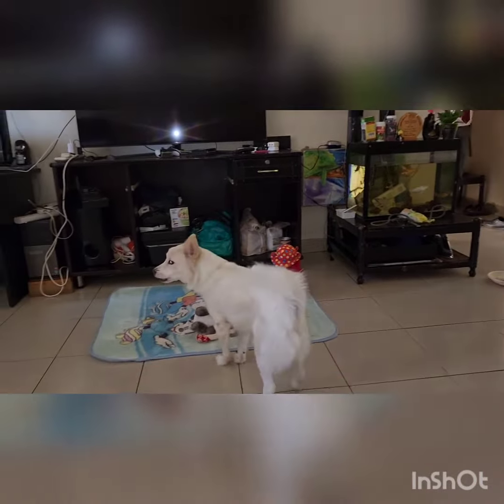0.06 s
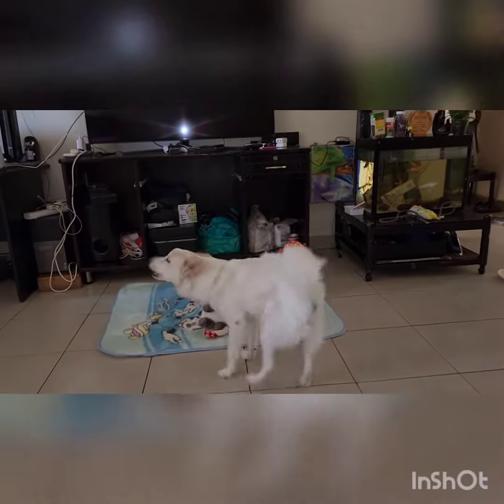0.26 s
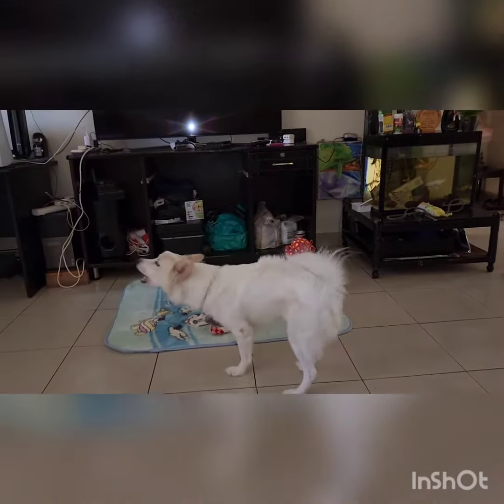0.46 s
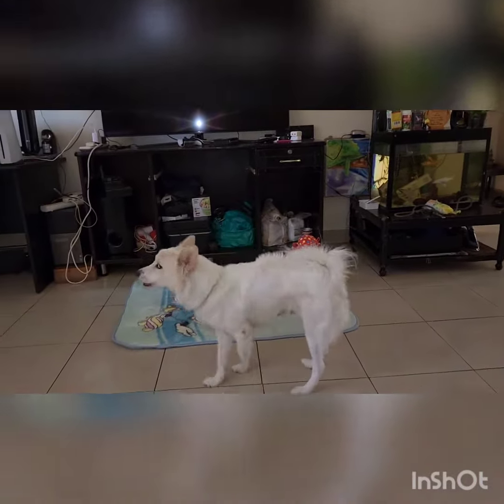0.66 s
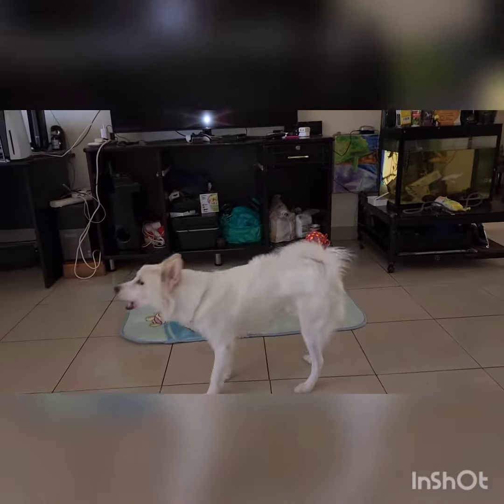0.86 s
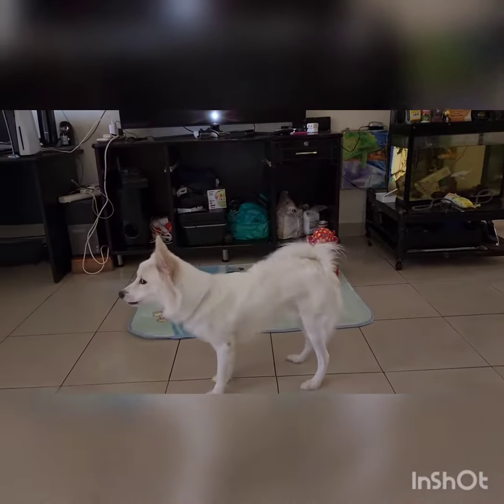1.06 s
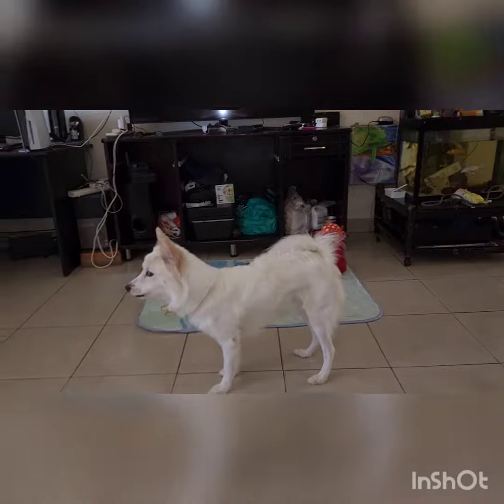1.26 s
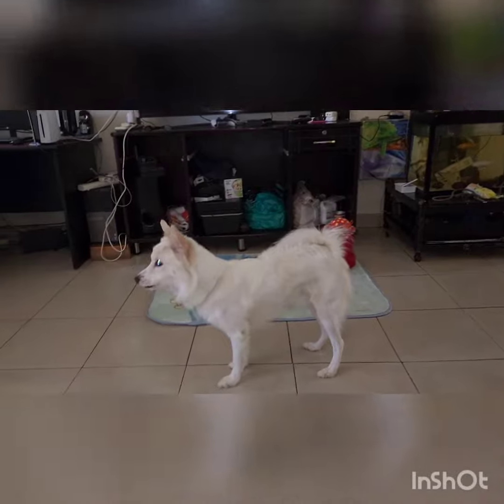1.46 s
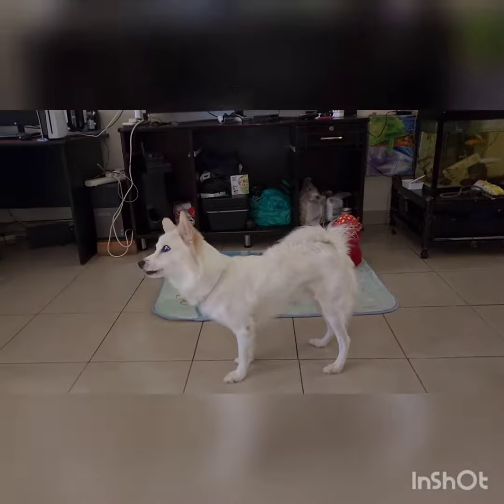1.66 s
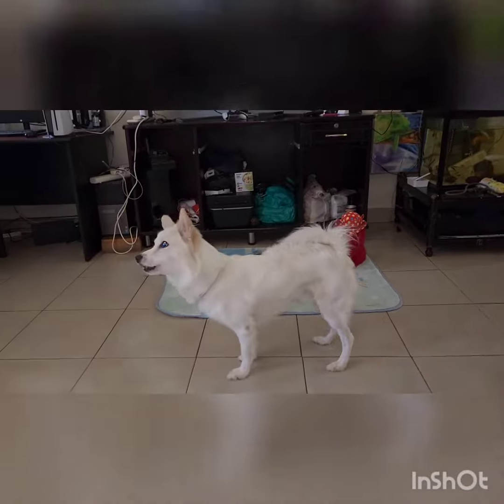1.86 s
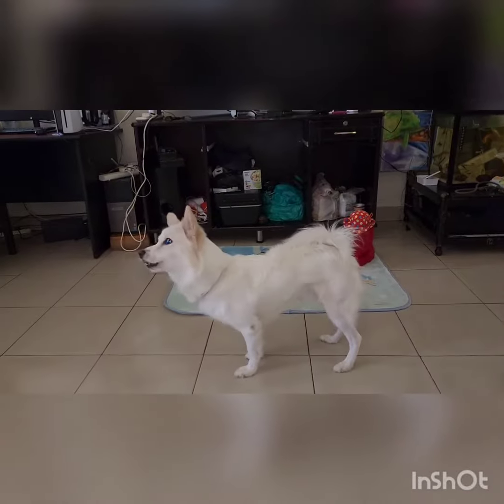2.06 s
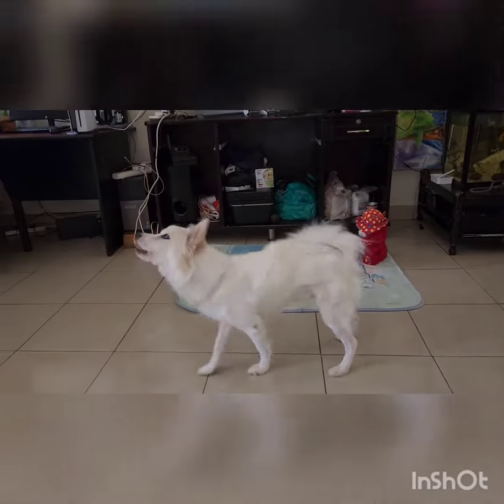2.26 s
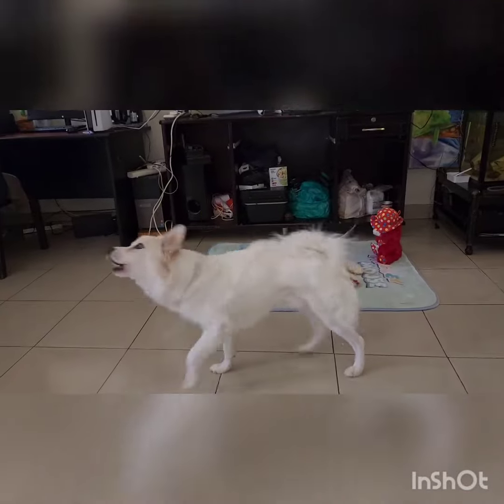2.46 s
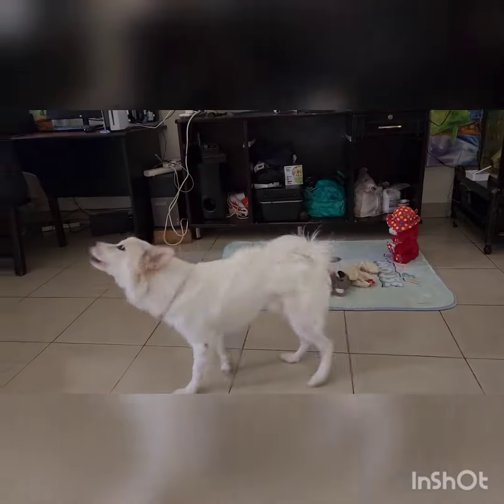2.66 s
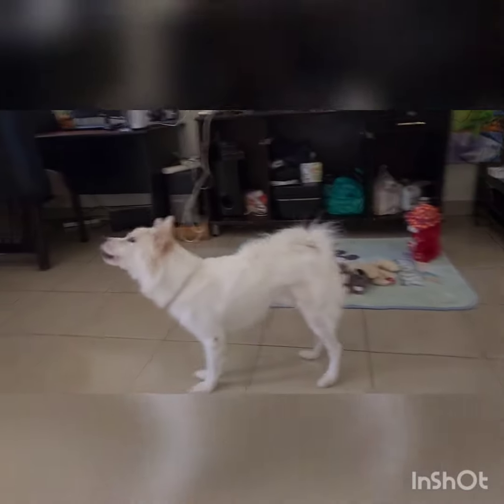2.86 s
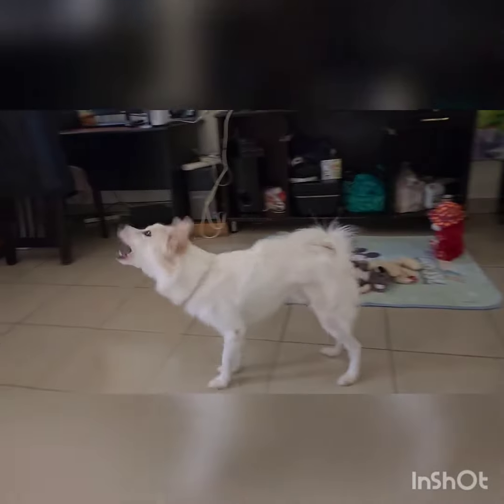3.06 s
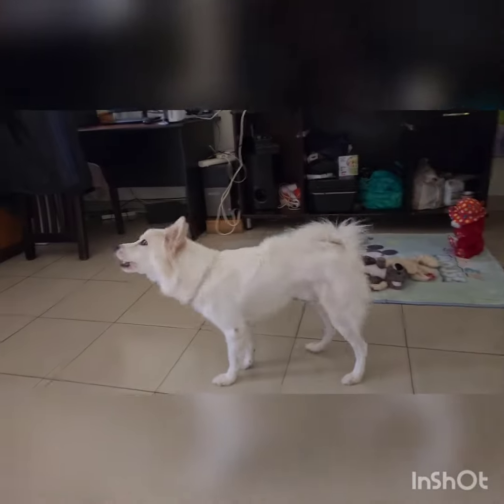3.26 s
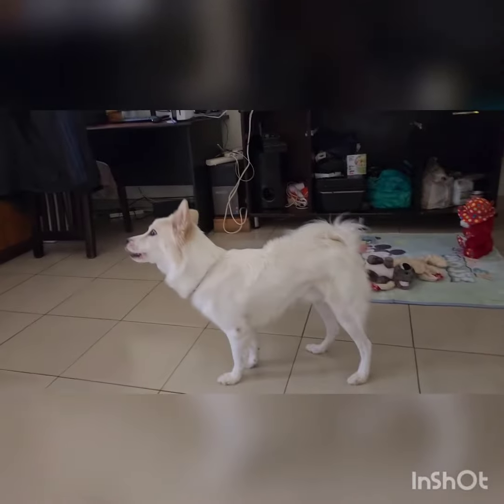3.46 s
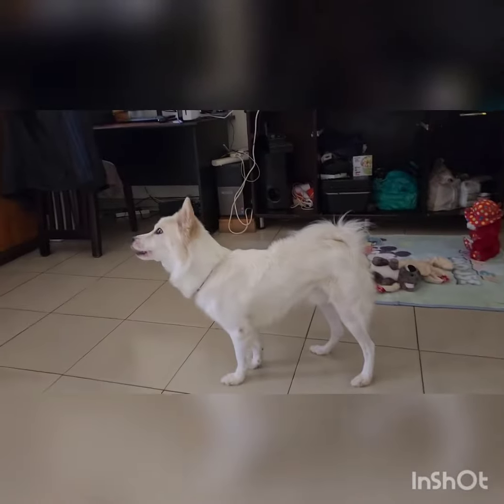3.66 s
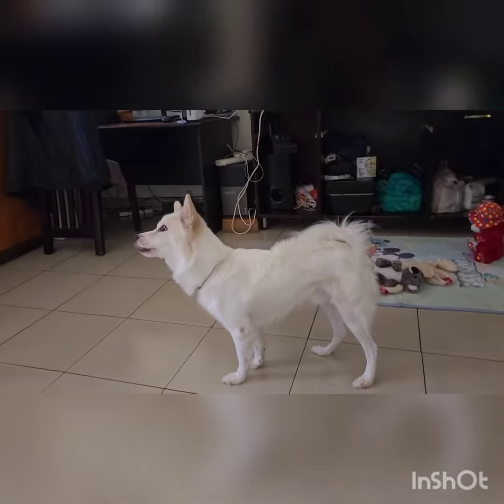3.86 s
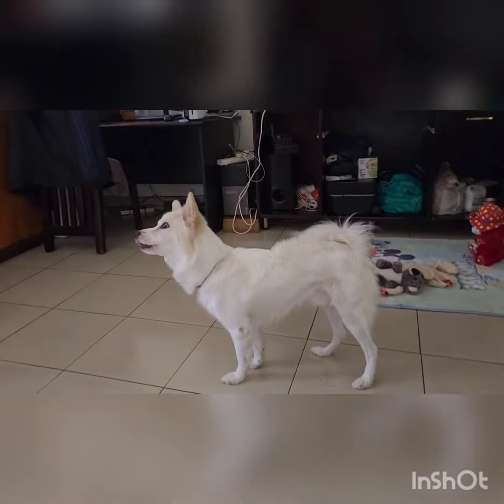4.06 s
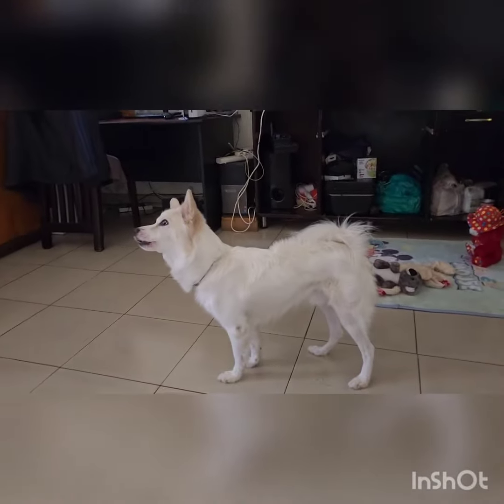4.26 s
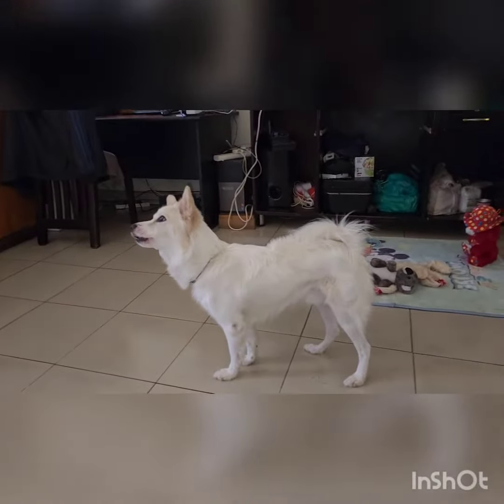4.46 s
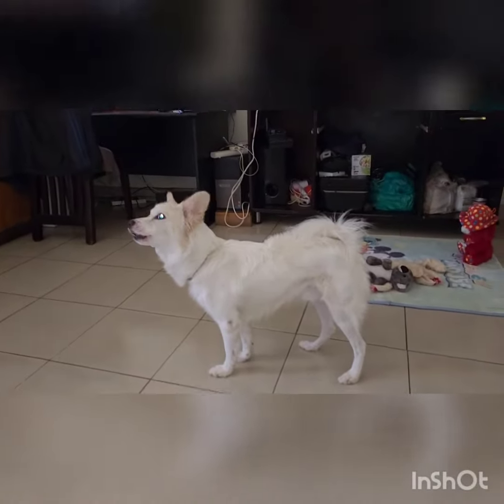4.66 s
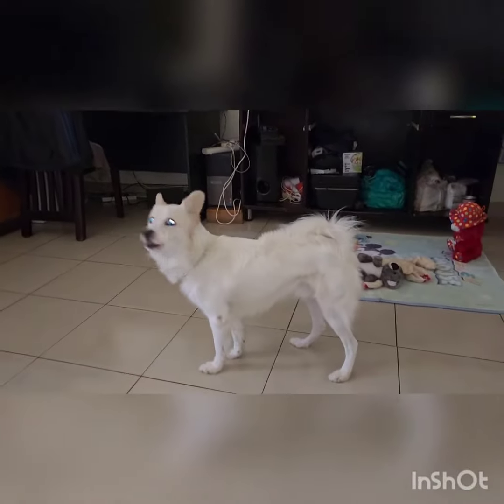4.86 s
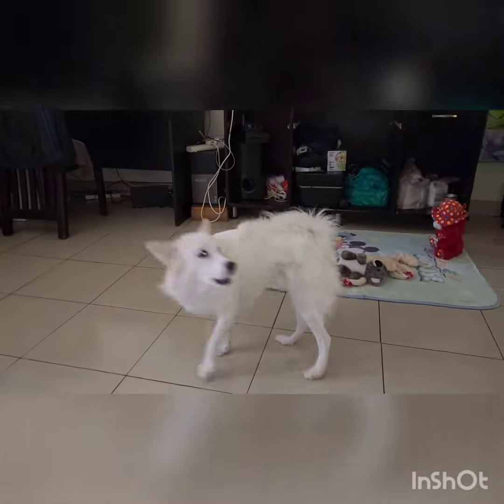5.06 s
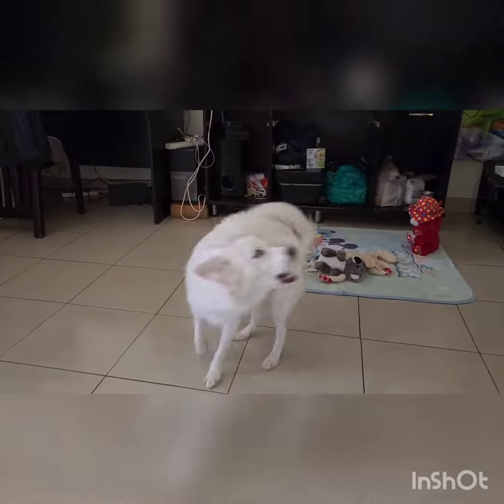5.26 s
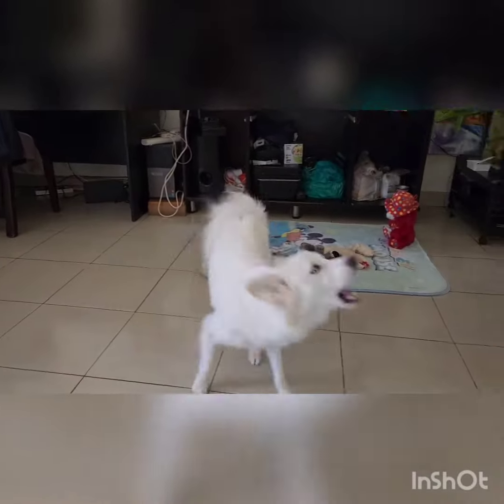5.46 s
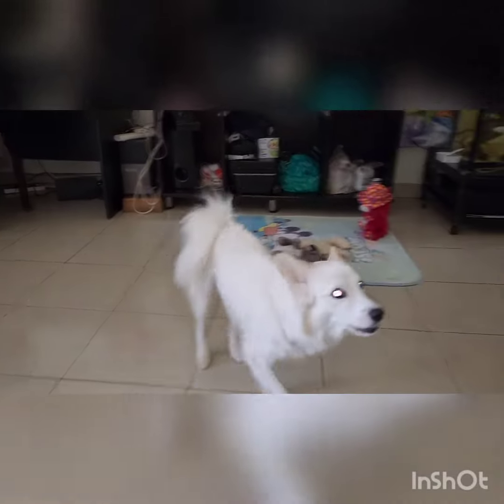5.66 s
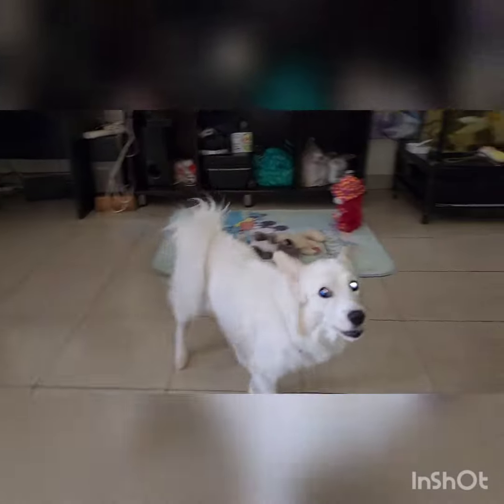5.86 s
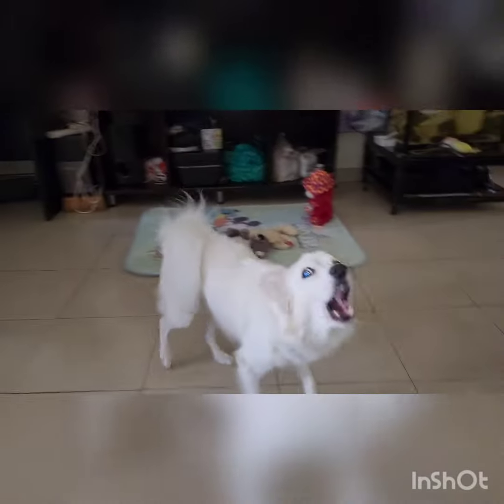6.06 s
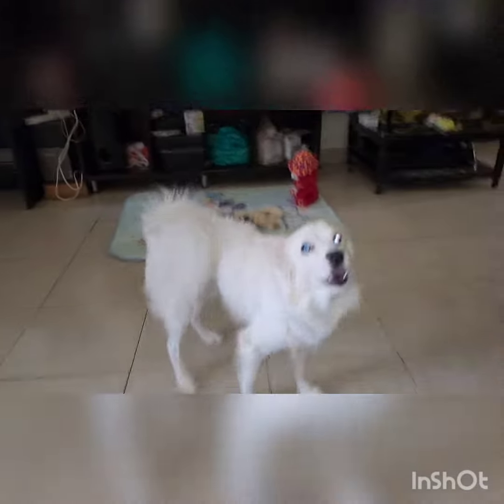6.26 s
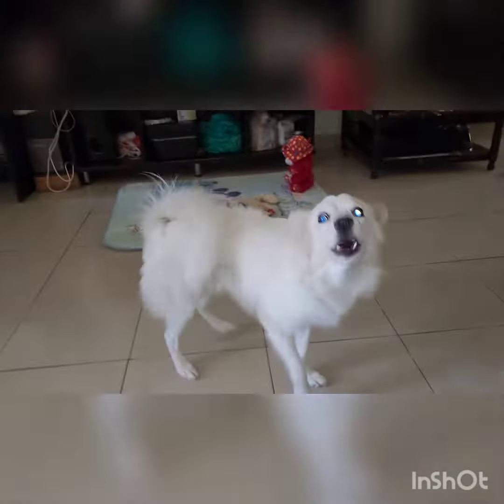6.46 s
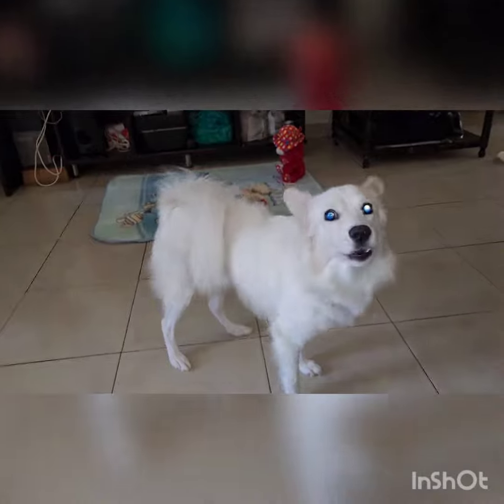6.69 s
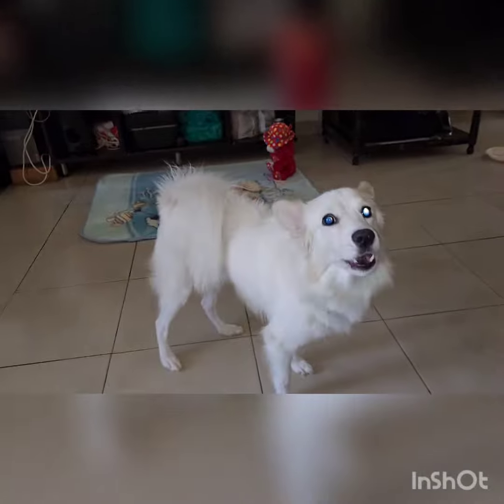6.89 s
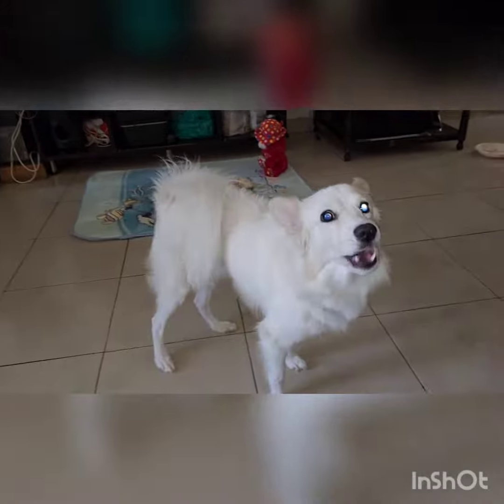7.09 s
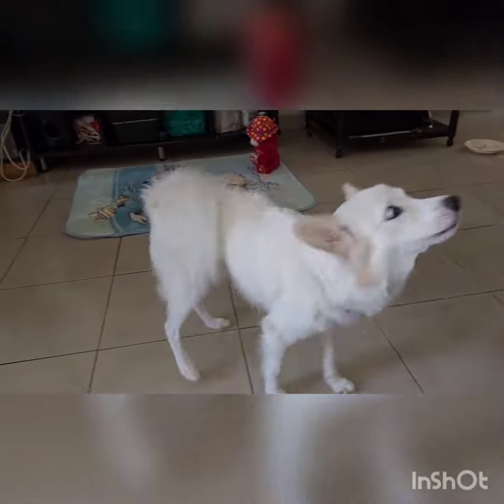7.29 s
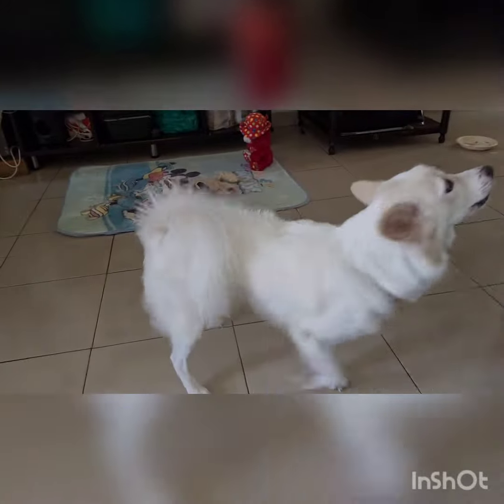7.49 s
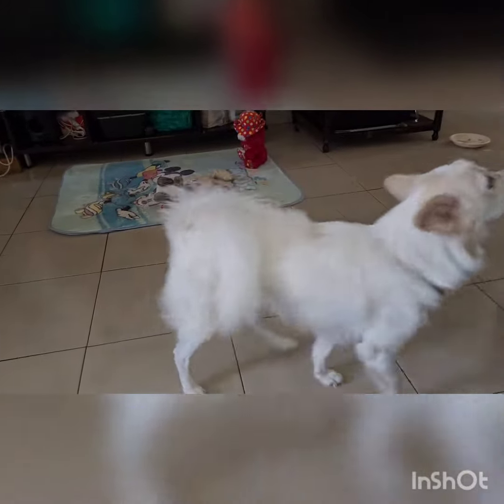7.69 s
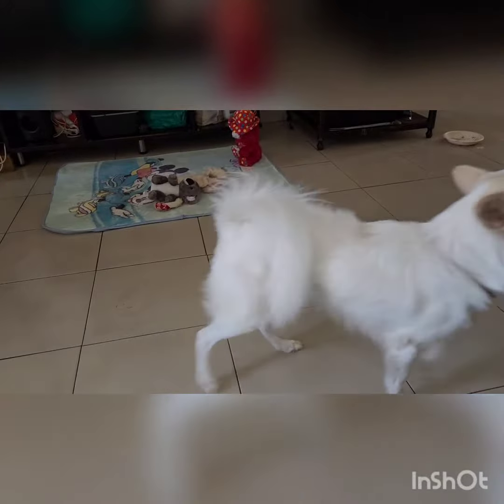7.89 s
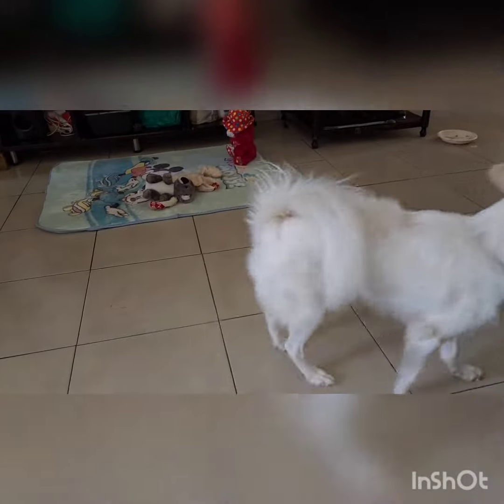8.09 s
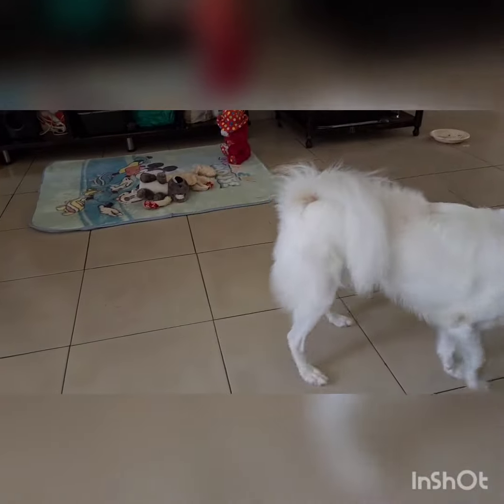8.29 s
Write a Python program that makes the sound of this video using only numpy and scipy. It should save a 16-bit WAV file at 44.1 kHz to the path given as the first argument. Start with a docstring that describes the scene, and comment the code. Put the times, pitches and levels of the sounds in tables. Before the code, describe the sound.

A small dog growls briefly and gives three quick, hoarse barks in the first second, echoing in a hard tiled room over a faint low hum. At about 1.9 seconds there is a bump with a short, deep boom. Four more barks follow between 2.2 and 3.3 seconds. Faint rustling fills the pause around 4 to 4.7 seconds, then come two dull, woody knocks just before 5 seconds and a light patter of claws on the tiles. A short growl rises into a sharp bark at 5.2 seconds, with three more by 6.5 seconds, now more direct and slightly to the right as the dog faces the microphone. Another growl at 6.9 seconds leads to a last bark at 7.2. A weaker growl comes at 7.7 seconds, and soft, low footfalls with faint claw ticks just after 8 seconds.

```python
"""Small dog in a tiled room

A small dog barks in quick bouts, often growling up to the first bark. Both calls follow the source-filter
principle: vocal folds drive the resonances of a mouth, which opens and closes on each hoarse arch of pitch.
The hard room reverberates. Bumps (one with a deep boom), rustles, claw ticks and footfalls fall in the
pauses, over a low hum."""
import sys
import numpy as np
from scipy import signal
from scipy.fft import rfft, irfft, next_fast_len
from scipy.io import wavfile
from scipy.ndimage import uniform_filter1d, minimum_filter1d, map_coordinates

SR = 44100
rng = np.random.default_rng(int(sys.argv[2]) if len(sys.argv) > 2 else 0)


def output_pcm(signal):
    """Save a mono or channel-first signal as 16-bit PCM at the path in sys.argv[1].

    Samples are clipped to [-1, 1] before scaling.
    """
    pcm = np.clip(np.atleast_2d(signal).T, -1, 1) * 32767
    wavfile.write(sys.argv[1], SR, np.round(pcm).astype(np.int16))


N = 367353
TIME = np.arange(N) / SR

# Levels are relative: each source has further gains in the mix.
BACKGROUND_LEVEL = [(0, -46.5), (1.6, -57), (4, -53), (4.7, -47.5), (5.6, -58), (8.3, -59)]  # rumble and hum: t/s, level/dB
RUMBLE_SPECTRUM = [(22, -22), (40, -13.5), (65, -12.5), (110, -10), (175, -14), (300, -24), (500, -31),
                   (1000, -37), (2500, -39.5), (5000, -47.5), (8000, -48), (15800, -61)]  # f/Hz, level/dB

# growls: start/s, length/s, chest/dB, mouth/dB, rattle/dB, swell/dB, first pulse rate/Hz,
# last pulse rate/Hz, unsteadiness/fraction of the rate
GROWLS = [ (0.026, .215, -29, -25, -50, 7, 210.6, 226.3, .03),
          (5.05, .18, -33, -23, -47.5, 5.5, 180.7, 219.6, .13),
          (6.917, .285, -39, -33.5, -55.5, 0.5, 264.7, 192, .03),
          (7.684, 0.17, -44, -42.5, -71.5, 6, 256.3, 124.4, 0.14)]
# resonances of the growl (chest, nearly closed mouth, bared teeth): f/Hz, level/dB
GROWL_CHEST = [(60, -50), (150, -24), (230, -6), (380, -10.5), (600, -17), (1500, -77)]
CLOSED_MOUTH = [(300, -27.5), (450, -0.5), (600, 10), (780, 3.5), (1000, -8.5), (1500, -5), (1850, -19),
                (2250, -11.5), (2800, -46.5), (4000, -61)]
TEETH = [(2000, -33), (3400, -8), (4050, 0), (4600, -5), (5400, -19.5), (6200, -11.5), (6800, -28.5),
         (7900, -12.5), (9300, -28.5), (11000, -19.5), (15000, -34.5)]

# barks: start/s, time to crest/s, length/s, top pitch/Hz, held pitch/Hz, fundamental/dB, its fade/(dB/s),
# overtones/dB, rasp/dB, bite/dB, final roughness (0-1), scale factor of the mouth resonances
BARKS = [ (0.219, .06, 0.22, 679.8, 560.2, -6, 190, -11, -34.5, 3, .15, 0.98),
         (0.502, .055, 0.17, 622, 611.3, -15.5, 41, -17, -38.5, -3, .15, 0.93),
         (0.843, 0.059, 0.16, 653.8, 607.4, -16.5, 142.5, -18, -41, -5, 0.3, 1.024),
         (2.159, 0.046, 0.14, 708.5, 599.5, -6, 162.5, -10.5, -33.5, 0, 0.28, 0.97),
         (2.386, .048, 0.17, 690.5, 532, -14.5, 130, -21, -40, -6.5, 0.7, 0.91),
         (2.632, 0.046, 0.18, 697, 563.8, -13, 133.5, -19.5, -40.5, -2.5, 0.48, .92),
         (3.122, 0.038, .16, 712, 575.5, -13, 167, -19.5, -42.5, -5, 0.5, 0.94),
         (5.225, .054, .148, 746.2, 682.5, -4.5, 175.5, -7.5, -28.5, 12, .08, 1.03),
         (5.511, 0.065, 0.17, 739, 676, -15, 4, -18.5, -36.5, 0.5, .15, 0.96),
         (6.047, .05, 0.15, 765, 716, -11.5, 8.5, -13, -31.5, -3.5, 0.02, 1.04),
         (6.428, 0.031, 0.14, 821.8, 677.5, -11.5, 92, -14, -34, 2.5, 0.32, 1.027),
         (7.204, .052, .13, 828.5, 666.8, -9, 181, -15.5, -34.5, 0.5, 0.2, 1.057)]
# spectra of the bark (open mouth, upper resonances, chest, noise round the fundamental): f/Hz, level/dB
OPEN_MOUTH = [(600, -38), (900, -20.5), (1150, 8), (1350, -7.5), (1600, -9), (2000, -9), (2300, -28.5),
              (2600, -34), (3200, -44.5), (4500, -80)]
RASP = [(1800, -25), (2600, -12.5), (2950, 5.5), (3400, -6.5), (3900, 2), (4500, -3), (5200, -3.5),
        (6500, 1), (8000, 1.5), (9500, -8.5), (11400, -7.5), (14000, -14.5), (15800, -18)]
BARK_CHEST = [(50, -22.5), (130, -12.5), (230, -2), (350, -5.5), (600, -12), (1200, -54.5)]
HOARSENESS = [(150, -63.5), (350, -20), (550, -4.5), (780, 7), (1000, -8), (1500, -44.5)]

FACING = [(0, 0.1), (3.3, 0), (5.2, 0.2), (5.6, 0.4), (6.05, 0.79), (6.6, 0.7), (7.3, 0.97), (7.9, 0.7)]  # muzzle towards the microphone: t/s, share (0-1)
FRONTAL_BALANCE = [(100, -1), (700, 0), (1300, -5), (2400, -29.5), (4400, -20), (8000, -25), (15000, -1)]  # direct sound of the facing dog: f/Hz, left minus right/dB
ROOM_DECAY = [(100, 0.17), (300, .65), (650, 0.79), (1600, 0.92), (3000, 0.63), (7000, 0.56), (15000, 0.42)]  # reverberation time: f/Hz, T60/s
ROOM_GAIN = [(100, -7), (600, -1), (1500, -6.5), (3000, 2), (7000, 1), (15000, 3.5)]  # strength of the reverberation: f/Hz, level/dB
COHERENCE = [(100, 0.93), (250, 0.96), (600, 0.67), (800, 0.36), (1300, 0.18), (3000, 0.067),
             (12000, 0.037)]  # diffuse field: f/Hz, left-right coherence (0-1)

LONE_TICKS = [(1.376, -56.5), (8.069, -58.5)]  # t/s, level/dB
SCRAMBLES = [(4.922, 5.225, -49.5), (8.157, 8.298, -65)]  # claws on the tiles: start/s, end/s, level/dB
TICK_SPECTRUM = [(1000, -15), (3500, -6), (6000, -5), (15000, -16.5)]  # f/Hz, level/dB

BUMPS = [(1.835, -44.5, -61.5, -39.5, 0.99), (1.909, -22, -26.5, -43, 0.66),
         (4.323, -69.5, -44.5, -69, 0.6), (4.368, -69.5, -45.5, -67, 0.19),
         (4.766, -17.5, -23, -53.5, 0.18), (4.899, -72, -68, -53, .4), (4.935, -21, -16.5, -48, 0.23),
         (4.963, -43, -25.5, -56, 0.77), (8.148, -54.5, -40.5, -61, 0.36), (8.201, -49, -48, -58, 0.346)]  # impacts: t/s, knock/dB, thud/dB, scuff/dB, T60/s
# spectra of an impact's three parts, and the modes of the boom: f/Hz, level/dB
KNOCK = [(180, -36.5), (300, -2), (460, -5.5), (800, -0.5), (1050, -6), (1450, -7), (2000, -12),
         (2700, -27), (3400, -35.5), (5000, -52.5), (10000, -69)]
THUD = [(30, -39), (70, -22), (110, -2.5), (155, -9.5), (200, -2), (260, -3.5), (330, -18), (450, -13),
        (600, -41), (1000, -75)]
SCUFF = [(1470, -25.5), (2500, -4.5), (5980, -14.5), (7530, -10), (9790, -17.5), (14600, -20), (15800, -31)]
BOOM_MODES = [(37, -14), (59.5, -6.5), (119, -18), (168, -31.5), (282, -21.5)]

RUSTLES = [(3.855, 0.33, -63), (4.294, 0.41, -63.5)]  # start/s, length/s, level/dB
RUSTLE_SPECTRUM = [(700, -15), (1900, 3), (3000, -7), (7000, -8), (10000, -12), (15000, -14.5)]  # f/Hz, level/dB
FOOTFALLS = [(8.157, -35.5), (8.202, -37)]  # t/s, level/dB
FLOOR_SPECTRUM = [(20, -7.5), (50, -9), (110, 9.5), (170, -14), (400, -48.5)]  # f/Hz, level/dB


def amp(db):
    """Amplitude ratio of a level in decibels."""
    return 10 ** (np.asarray(db) / 20)


def unit(x):
    """Normalisation to an rms of 1."""
    return x / np.sqrt(np.mean(x ** 2) + 1e-20)


def along(points, hz):
    """Interpolation of (f/Hz, value) points on a logarithmic frequency axis."""
    f, values = np.transpose(points)
    return np.interp(np.log(hz + 1), np.log(f + 1), values)


def curve(points):
    """Linear interpolation of (t/s, value) points at every sample."""
    return np.interp(TIME, *np.transpose(points))


def wobble(rate, size=N):
    """Smooth random modulation: a spline through `rate` knots a second."""
    knots = rng.standard_normal(int(size * rate / SR) + 4)
    return unit(map_coordinates(knots, [np.arange(size) * rate / SR]))


def gate(age, length, attack_s, release_s):
    """Envelope of a call: a linear attack and a smooth release."""
    return np.clip(age / attack_s, 0, 1) * (1 - np.tanh((age - length) / release_s / 2)) / 2


def filtered(x, response):
    """Linear filtering: the spectrum is multiplied by a frequency response."""
    n = x.shape[-1]
    padded = next_fast_len(n + 8192)
    return irfft(rfft(x, padded) * response(np.fft.rfftfreq(padded, 1 / SR)), padded)[..., :n]


def coloured(x, spectrum, size=4096):
    """Minimum-phase filtering: folding the cepstrum makes a (f/Hz, level/dB) shape causal."""
    cepstrum = irfft(np.log(amp(along(spectrum, np.fft.rfftfreq(size, 1 / SR)))))
    cepstrum[1:size // 2] *= 2
    cepstrum[size // 2 + 1:] = 0
    return signal.fftconvolve(x, irfft(np.exp(rfft(cepstrum))))[:len(x)]


def noise(spectrum, size=N):
    """Spectrally shaped Gaussian noise of rms 1."""
    return unit(coloured(rng.standard_normal(size), spectrum))


def diffuse(pair):
    """A diffuse field is coherent at two microphones in the bass and incoherent in the treble."""
    angle = lambda hz: np.arccos(np.clip(along(COHERENCE, hz), -1, 1)) / 2
    mid, side = filtered(pair, lambda hz: np.array([np.cos(angle(hz)), np.sin(angle(hz))]))
    return np.array([mid + side, mid - side])


def background(hum_hz=59.2):
    """A diffuse rumble lies under a hum that wavers by phase modulation."""
    rumble = diffuse(np.array([noise(RUMBLE_SPECTRUM), noise(RUMBLE_SPECTRUM)]))
    hum = np.sin(2 * np.pi * hum_hz * TIME + 0.5 * wobble(5.6))
    return amp(curve(BACKGROUND_LEVEL)) * (rumble + 0.9 * hum)


def growl_controls():
    """Amplitude and frequency modulation: each growl swells while its pulse rate glides."""
    gains, rate_hz, unsteadiness = np.zeros((3, N)), np.zeros(N), np.zeros(N)
    for start, length, *levels_db, swell_db, first_hz, last_hz, waver in GROWLS:
        age = TIME - start
        progress = np.clip(age / length, 0, 1)
        voiced = gate(age, length, attack_s=0.029, release_s=0.017)
        gains += np.outer(amp(levels_db), voiced * amp(swell_db * (progress - 1)))
        rate_hz = np.where(age > 0, first_hz + (last_hz - first_hz) * progress, rate_hz)
        unsteadiness[age > 0] = waver
    return *gains, rate_hz, unsteadiness


def growls(uneven_db=2.6, breathiness=0.73):
    """Source and filter: slack folds slap unevenly, heard through chest, nearly closed mouth and teeth."""
    chest, mouth, rattle, rate_hz, unsteadiness = growl_controls()
    cycles = np.cumsum(rate_hz * (1 + unsteadiness * wobble(120))) / SR
    slaps = np.diff(np.floor(cycles), prepend=0) * amp(uneven_db * wobble(200))
    puffs = np.exp(-4 * (cycles % 1)) * rng.standard_normal(N)
    source = unit(slaps) + breathiness * unit(puffs)
    through = lambda spectrum: unit(coloured(source, spectrum))
    voice = chest * through(GROWL_CHEST) + mouth * through(CLOSED_MOUTH) + rattle * through(TEETH)
    return amp(0.76) * voice


def bark_gains(age, crest, length, fundamental_db, fade_db_per_s, overtones_db, rasp_db):
    """Amplitude follows the push of air to its crest; overtones and rasp also need an open mouth."""
    swell_db = -5.5 * np.clip(1 - age / crest, 0, 1) ** 2
    fading_s = np.clip(age - crest, 0, length - crest)
    push_db = swell_db - 117 * fading_s
    shut = 1 - np.sin(np.pi * np.clip(age / length, 0, 1))  # the mouth opens and closes once
    voiced, airflow = (gate(age + lead_s, length + lead_s, attack_s=0.024, release_s=0.013)
                       for lead_s in (0, 0.0053))  # the rasp starts just ahead of the voice
    return (voiced * amp(fundamental_db + swell_db - fade_db_per_s * fading_s),
            voiced * amp(overtones_db + 0.76 * push_db - 8.5 * shut),
            airflow * amp(rasp_db + 0.38 * push_db - 9 * shut))


def bark_pitch(age, crest, length, top_hz, held_hz, settle_s=0.028, sag_octaves_per_s=8, knee_s=0.01):
    """The fundamental frequency scoops up to the crest, settles lower and sags as the air runs out."""
    scoop_octaves = 0.3 * np.clip(1 - age / crest, 0, 1) ** 1.5
    overshoot = np.exp(-(np.maximum(age - crest, 0) / settle_s) ** 2)
    sag_octaves = sag_octaves_per_s * knee_s * np.logaddexp(0, (age - length + 0.011) / knee_s)
    return (held_hz + (top_hz - held_hz) * overshoot) * 2 ** (-scoop_octaves - sag_octaves)


def rasp_spectrum(bite_db, bite_hz=3980, width_octaves=0.3):
    """Upper formants: one sharp resonance, the bite, is stronger in some barks than in others."""
    return [(hz, db + bite_db * np.exp(-(np.log2(hz / bite_hz) / width_octaves) ** 2)) for hz, db in RASP]


def bark(age, crest, length, top_hz, held_hz, fundamental_db, fade_db_per_s, overtones_db, rasp_db,
         bite_db, final_roughness, mouth_scale, jitter=0.04965, shimmer=0.57, closing=0.078):
    """The folds sing a strong fundamental; chaotic vibration smears its harmonics into pulsing noise."""
    size = len(age)
    low_gain, mouth_gain, rasp_gain = bark_gains(
        age, crest, length, fundamental_db, fade_db_per_s, overtones_db, rasp_db)
    settled = (1 + np.tanh((age - crest - 0.016) / 0.0088)) / 2
    roughness = 0.58 * (1 - settled) + final_roughness * settled  # most barks clear after the crest
    pitch_hz = bark_pitch(age, crest, length, top_hz, held_hz)
    phase = 2 * np.pi * np.cumsum(pitch_hz * (1 + jitter * roughness * wobble(259.7, size))) / SR
    depth = shimmer * roughness
    flutter = (1 + depth * wobble(329.1, size)) / np.sqrt(1 + depth ** 2)
    period_doubling = 1 + roughness * np.cos(phase / 2)  # strong and weak cycles alternate
    overtones = unit(sum(np.cos(k * phase) for k in range(2, 22))) * flutter * period_doubling
    puffs = unit((1 + np.cos(phase)) * flutter * rng.standard_normal(size))

    def vocal_tract(spectrum, noise_share):
        """Formants filter a blend of overtones and puffs, and sink as the mouth closes."""
        source = np.sqrt(1 - noise_share) * overtones + np.sqrt(noise_share) * puffs
        wide, narrow = (unit(coloured(source, np.multiply(spectrum, [mouth_scale * shift, 1])))
                        for shift in (1 + closing / 2, 1 - closing / 2))
        progress = np.clip(age / length, 0, 1)
        return (1 - progress) * wide + progress * narrow

    voice = low_gain * (np.sin(phase) * flutter + 0.62 * roughness * noise(HOARSENESS, size))
    voice += mouth_gain * vocal_tract(OPEN_MOUTH, np.minimum(1.4 * roughness, 1))
    voice += rasp_gain * vocal_tract(rasp_spectrum(bite_db), np.minimum(0.31 + 2 * roughness, 1))
    grunt = np.interp(age, [-0.06, -0.01, length + 0.061], [0.2, 1, 0.3])
    return voice + amp(-42) * grunt * noise(BARK_CHEST, size)


def barks():
    """Superposition of the barks, each with its chest grunt starting 0.1 s ahead."""
    out = np.zeros(N)
    for start, *settings in BARKS:
        first = int(start * SR) - SR // 10
        span = slice(first, first + SR * 9 // 20)
        out[span] += bark(TIME[span] - start, *settings)
    return out


def reverberation(x):
    """Dense reflections from tiles and walls decay exponentially, each band at its own rate."""
    hz, t, bands = signal.stft(rng.standard_normal((2, SR)), SR, nperseg=256)
    decay = amp(-60 * t / along(ROOM_DECAY, hz)[:, None])
    tail = signal.istft(bands * decay, SR, nperseg=256)[1]
    age = np.arange(tail.shape[1]) / SR
    near_walls = 1 + 2.13 * np.exp(-age / 0.015)  # early reflections are strongest
    tail = diffuse(tail) * np.clip(age / 0.0039, 0, 1) * near_walls
    tail = filtered(tail / np.linalg.norm(tail[0]), lambda hz: amp(along(ROOM_GAIN, hz)))
    return signal.fftconvolve(x[None], tail, axes=1)[:, :N]


def sympathetic_ring(barking, hz=546, t60=2.6):
    """Sympathetic resonance: an object rings with one note of the barks, less once the dog moves away."""
    age = TIME[:2 * SR]
    ring = np.sin(2 * np.pi * hz * age) * amp(-60 * age / t60)
    coupling = np.interp(TIME, [1.2, 2], [1, 0.15])
    return amp(-76.5) * signal.fftconvolve(barking * coupling, ring)[:N]


def ticks(t60=0.039, per_second=25, spread_db=4):
    """Brief contacts give bright clicks: two lone ones, and a random patter of claws on the tiles."""
    clicks = list(LONE_TICKS)
    for start, end, db in SCRAMBLES:
        times = rng.uniform(start, end, int((end - start) * per_second))
        clicks += [(t, db + spread_db * rng.standard_normal()) for t in times]
    envelope = sum(amp(db - 60 * np.abs(TIME - t) / t60) * (TIME > t) for t, db in clicks)
    return envelope * noise(TICK_SPECTRUM)


def bumps(crack=0.52, crack_s=0.0027):
    """Damped impacts: a woody knock with a short crack, a dull thud and a scuff decay together."""
    knock, thud, scuff = np.zeros((3, N))
    for start, knock_db, thud_db, scuff_db, t60 in BUMPS:
        age = np.maximum(TIME - start, 0)
        envelope = amp(-60 * age / t60) * np.clip(age / 0.0005, 0, 1)
        knock += amp(knock_db) * envelope * (1 + crack * np.exp(-age / crack_s))
        thud += amp(thud_db) * envelope * np.clip(age / 0.004, 0, 1)
        scuff += amp(scuff_db) * envelope
    return amp(-3.5) * (knock * noise(KNOCK) + thud * noise(THUD) + scuff * noise(SCUFF))


def boom(start_s=1.9, attack_s=0.011, hold_s=0.295, release_s=0.008, hum_t60=4.5):
    """A heavy bump excites low modes: their drone holds, stops short and leaves a faint hum."""
    age = TIME - start_s
    since_stop = np.maximum(age - hold_s, 0)
    rise = lambda t: np.clip(t / attack_s, 0, 1)
    onset = np.maximum(rise(age), amp(-21.5) * rise(age + 0.068))  # a lighter contact comes first
    release = np.maximum(np.exp(-since_stop / release_s), amp(-21 - 60 * since_stop / hum_t60))
    modes = sum(amp(db) * np.sin(2 * np.pi * hz * TIME + 0.3 * wobble(54)) for hz, db in BOOM_MODES)
    return amp(-18) * onset * release * unit(modes)


def rustles(flicker_db=3):
    """Random amplitude modulation turns diffuse noise into soft, grainy swishes."""
    envelope = np.zeros(N)
    for start, length, db in RUSTLES:
        progress = np.clip((TIME - start) / length, 0, 1)
        envelope += amp(db) * np.sqrt(np.abs(np.sin(np.pi * progress)))
    grain = amp(flicker_db * wobble(90))
    swish = diffuse(np.array([noise(RUSTLE_SPECTRUM), noise(RUSTLE_SPECTRUM)]))
    return envelope * unit(grain * swish)


def footfalls(attack_s=0.016, t60=0.29):
    """Heavy, soft impacts shake the floor at low frequencies only."""
    envelope = sum(amp(db - 60 * np.abs(TIME - t) / t60) * np.clip((TIME - t) / attack_s, 0, 1)
                   for t, db in FOOTFALLS)
    return envelope * noise(FLOOR_SPECTRUM)


def scene(left_lead_s=0.00013):
    """Directivity: turned away, the dog is heard mostly via the walls; facing, it is direct, to the right."""
    barking, growling, knocks = barks(), growls(), bumps()
    facing = curve(FACING)
    sides = np.array([[0.5], [-0.5]])  # left, right
    direct = filtered(barking + amp(-1) * growling,
                      lambda hz: np.exp(2j * np.pi * hz * sides * left_lead_s))
    frontal = filtered(direct, lambda hz: amp(sides * along(FRONTAL_BALANCE, hz)))
    dog = facing * frontal + (1 - facing) * amp(-3) * direct
    towards_walls = (barking + amp(4) * growling) * amp(0.27 - 3.5 * facing)
    dog += reverberation(towards_walls) * amp(-0.8 * sides)
    thumps = amp(-2) * knocks + amp(6.5) * reverberation(knocks) + boom() + footfalls()
    return dog + sympathetic_ring(barking) + thumps + ticks() + rustles() + background()


def record(dry, cutoff_hz=15850):
    """Peak limiting and band limiting: the gain dips at the highest peaks, then a low-pass follows."""
    needed_gain = 1 / np.maximum(np.abs(dry).max(axis=0), 1)
    gain = uniform_filter1d(minimum_filter1d(needed_gain, size=400), size=300)
    return filtered(dry * gain, lambda hz: hz < cutoff_hz)


dry = scene()
out = record(dry)
output_pcm(out)
```